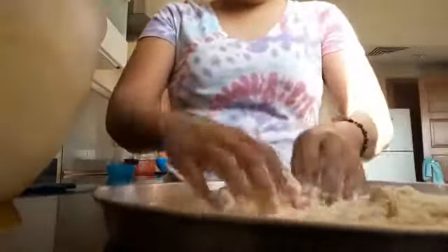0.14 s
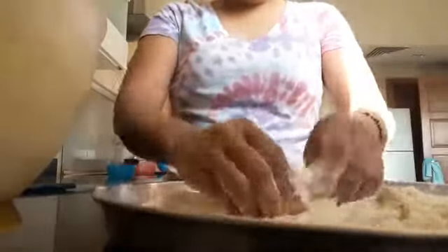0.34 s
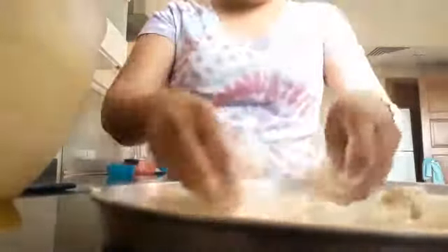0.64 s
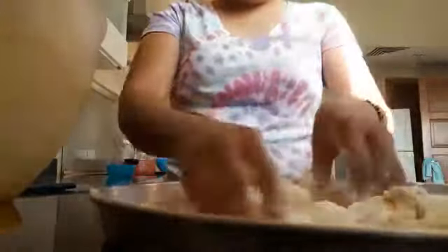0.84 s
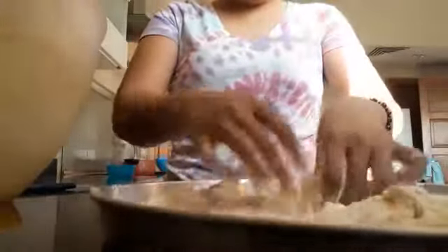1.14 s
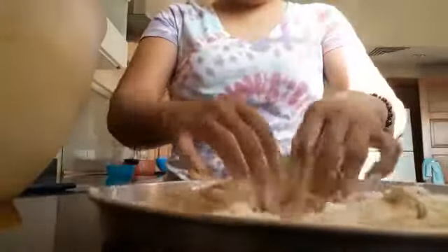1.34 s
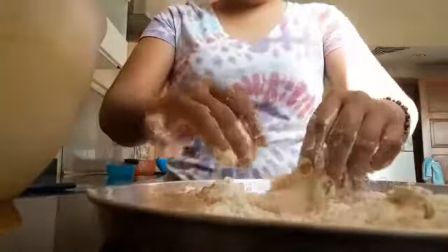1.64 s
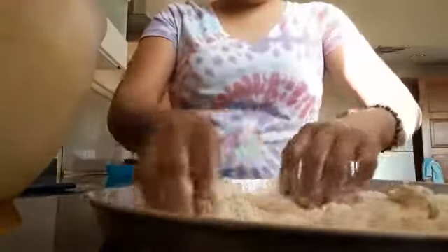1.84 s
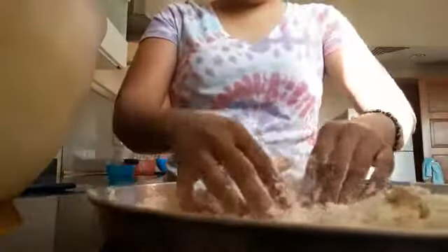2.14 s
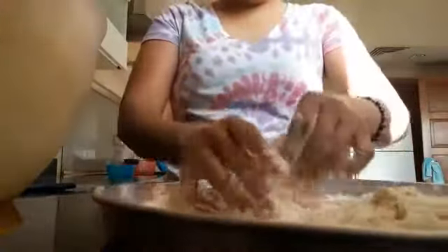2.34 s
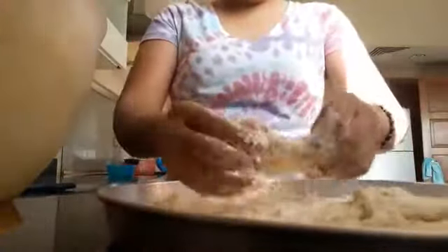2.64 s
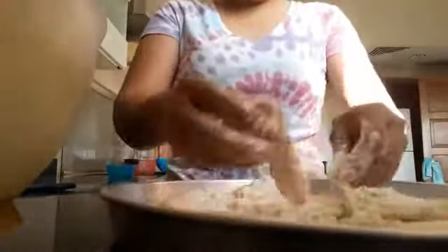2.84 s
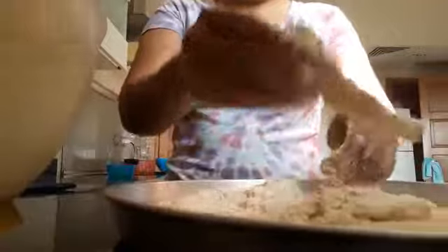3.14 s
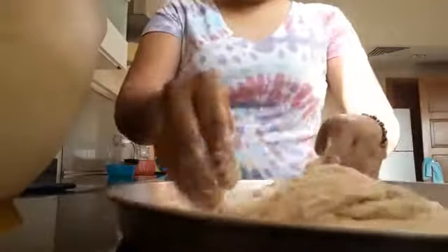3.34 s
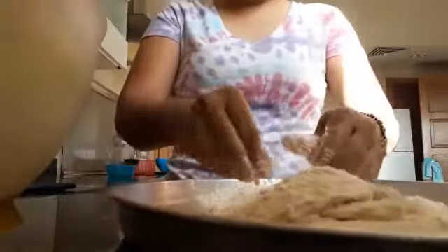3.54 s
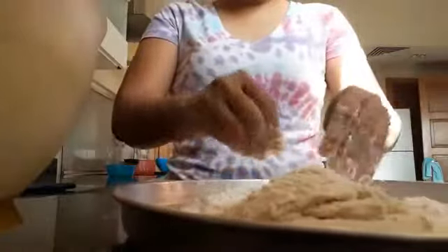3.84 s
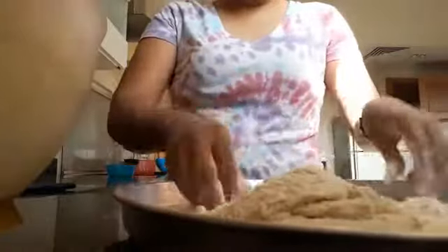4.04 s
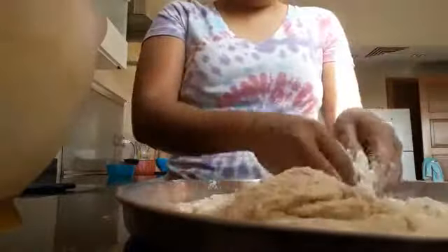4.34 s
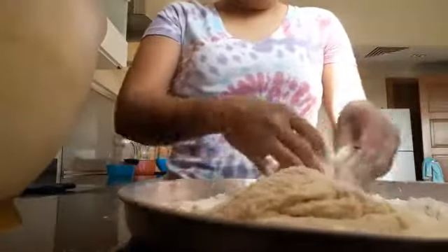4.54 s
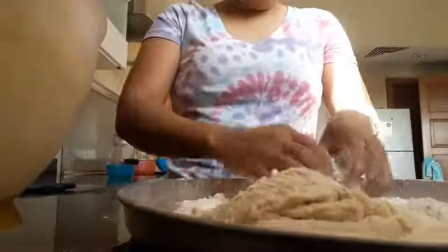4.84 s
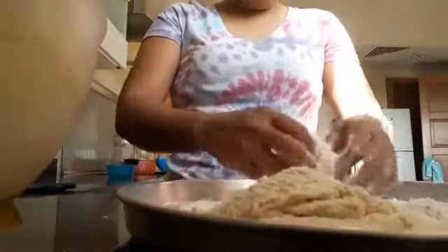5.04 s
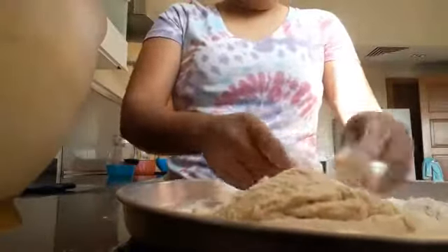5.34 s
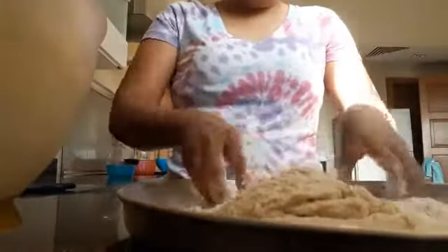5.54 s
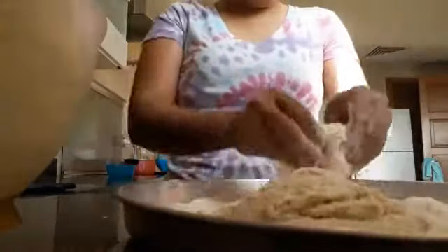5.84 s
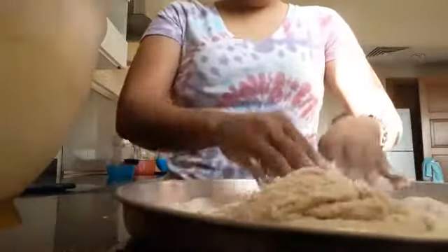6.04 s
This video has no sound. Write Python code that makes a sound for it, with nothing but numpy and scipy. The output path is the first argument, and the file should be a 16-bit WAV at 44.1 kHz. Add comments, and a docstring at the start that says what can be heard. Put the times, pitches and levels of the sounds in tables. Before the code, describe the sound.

Hands turn floured chicken in a wide metal pan: short dry scrapes, powdery hiss, crumbly patter and muffled thuds, with quiet gaps and faint motor hum.

```python
"""Flouring chicken in a metal pan

Two hands turn chicken in dry flour in a wide metal pan, close to a phone in a small kitchen.
Finger strokes rasp: clumped random slips drive the pan's resonances, and filtered grains crunch and hiss.
Loose flour trickles and meat flops as grain showers that swell and run out; bumps, cracks and taps are
short noise bursts. An appliance hums with wavering sines over coloured noise, and a noise tail rings briefly."""
import sys
import numpy as np
from scipy import signal
from scipy.fft import rfft, irfft, next_fast_len
from scipy.io import wavfile
from scipy.ndimage import uniform_filter1d, map_coordinates

SR = 44100
rng = np.random.default_rng(int(sys.argv[2]) if len(sys.argv) > 2 else 0)


def file_out(sig):
    """Save sig as 16-bit WAV at sys.argv[1]."""
    # one column per channel
    cols = np.atleast_2d(sig).T
    # limit, then scale
    lim = np.clip(cols, -1, 1)
    pcm = np.round(lim * 32767).astype(np.int16)
    wavfile.write(sys.argv[1], SR, pcm)


N = 272979

# Finger strokes. Each row: push start in seconds, grip time before it, push time and ease time in seconds,
# swell in dB, rasp, powder hiss and pan body in dB before the mix trims,
# place from 0 (middle of the floor) to 1 (toward the rim), pitch ratio of the pan's ring.
FINGER_STROKES = [ (0.0, .01, 0.0037, 0.0095, -5, -41.5, -47, -47, 0, .99),
                  (0.222, 0.011, 0.065, 0.068, 11.5, -37, -39, -58.5, 0.1, 1.02),
                  (.863, 0.033, 0.091, 0.055, 16, -27, -36, -42.5, .8, 1),
                  (.993, .006, 0.0049, 0.0094, 3, -25.5, -40.5, -47, 1, 1),
                  (1.158, 0.02993, 0.017, .015, 8.5, -36.5, -42, -46, .54, 1.02),
                  (1.212, 0.029, .022, 0.0087, 6, -35, -39, -46.5, 0.8, 1.02),
                  (1.256, .008, 0.0042, .004, 3.5, -42, -48.5, -50, .8, 1),
                  (1.279, 0.0086, 0.019, 0.012, 1, -26.5, -36, -48, 1, 1),
                  (1.899, 0.0074, 0.052, 0.0075, 13, -37, -43, -59, .1, .98),
                  (1.957, 0.013, .033, 0.0055, 3.5, -25, -35.5, -44, 0.3, .99),
                  (2.02, 0.024, 0.047, 0.075, 5, -46, -56, -54.5, 0.7, 1),
                  (2.2, 0.0397, 0.023, .02, 3, -52, -62.5, -68, 0.3, 1),
                  (2.32, 0.036, 0.052, 0.08, 1.5, -58, -66, -59, 0.54, 1),
                  (3.546, .02, 0.013, .01, 4, -60, -64, -67, 0.02, 1.06),
                  (4.066, .018, .012, 0.03537, 2, -45.5, -49, -52, 0.1, 1.06),
                  (4.12, .03, 0.039, 0.092, 9, -37.5, -43, -50.5, 0.5, .94),
                  (4.18, 0.029, 0.072, 0.0079, 10, -34.5, -36, -54, .4, .98),
                  (4.257, .004, 0.047, 0.016, 3.5, -20, -33.5, -45, 0, 1.02),
                  (4.319, 0.022, 0.0061, .05, 0, -34.5, -43, -45, 0.4, .99),
                  (4.75, 0.033, 0.032, .014, 7.5, -49, -57.5, -70, 0.11, 1),
                  (4.807, 0.031, 0.027, 0.03, 4, -53.5, -50.5, -79, 0.16, 1),
                  (4.907, .009, 0.035, 0.0073, 5, -34.5, -45.5, -48.5, 0.12, 1.01),
                  (5.617, 0.025, 0.072, 0.05, 5, -26, -37, -42.5, 0.1, 1.03),
                  (5.72, 0.022, .025, 0.033, 4, -34, -35, -52.5, 0.2, 1.05), ]
# Pan resonances under the fingers, mid-floor and near the rim.
# Each row: frequency in Hz, width in Hz, relative level in dB.
MIDDLE_RESONANCES = [(1123, 240, -13.5), (1788, 166, 4.5), (2082, 152, 2.5), (2590, 150, -12),
                     (3150, 180, -3), (3590, 260, -5.5), (4120, 110, -1), (4960, 220, -11)]
RIM_RESONANCES = [(1061, 64, -8), (1545, 48, -5), (2435, 130, -4.5), (2766, 390, -3.5), (3950, 130, -1),
                  (5270, 580, -5.5)]
# Tone of crunching lumps, hissing powder and the pushed heap. Each row: frequency in Hz, filter gain in dB.
CRUNCH_SPECTRUM = [(300, -27), (800, -33.5), (1200, -6), (3000, 2), (5500, -11), (7000, -11.5),
                   (15000, -25.5)]
POWDER_SPECTRUM = [(1500, -17), (4000, -1.5), (5800, 1), (7000, -0.5), (9500, 2), (11000, -0.5), (13000, 4),
                   (14500, -3.5), (15600, -13.5)]
BODY_SPECTRUM = [(100, -21), (250, -6.5), (450, -0.5), (700, 0.5), (1000, -1), (1300, 2.5), (2200, -30),
                 (6000, -89.5)]
# Spills of loose flour off the fingers and the meat. Each row: start, rise and run-out in seconds,
# crumbs and fine dust in dB before the mix trims.
FLOUR_SPILLS = [ (0.0, 0.0086, 0.26, -45, -63.5), (1.0, .06, 0.55, -52, -55.5),
                (1.12, 0.058, 0.39, -46.5, -58), (1.31, 0.03, 0.32, -53, -58),
                (1.665, 0.058, 0.58, -54.5, -60), (1.99, 0.066, 0.39, -44, -47.5),
                (2.28, .06, 0.47, -53.5, -59), (3.199, 0.11, 0.56, -66, -78), (3.734, 0.028, .15, -64, -56),
                (3.88, 0.047, 0.096, -78.5, -64.5), (5.589, 0.0071, 0.11, -48, -47.5),
                (6.135, 0.021, 0.13, -66.5, -72.5), ]
# Tone of trickling crumbs and falling dust. Each row: frequency in Hz, filter gain in dB.
CRUMB_SPECTRUM = [(500, -17), (900, 2.5), (1200, 0), (1500, -4), (1900, 0.5), (2300, -1), (2700, -0.5),
                  (3400, -8), (4100, -9.5), (6000, -12.5), (10000, -34)]
DUST_SPECTRUM = [(2000, -18.5), (4200, -15), (5500, 1), (7000, 2.5), (9000, 4.5), (11000, -1), (13000, -2),
                 (15000, -5), (15600, -14.5)]
# Meat dropped softly into the heap, and the turned piece settling on it.
# Each row: start, rise and run-out in seconds, level in dB (the flops before a mix trim).
MEAT_FLOPS = [(0.0, 0.0032, 0.31, -51.5), (.38, .04, 0.32, -52.5), (1.03, 0.078, 0.56, -55),
              (1.675, 0.019, 0.26, -41.5), (1.99, 0.02, 0.39, -50)]
MEAT_SETTLING = [ (3.15, .16, .36, -50.5), ]
# Hands and meat bumping the pan. Each row: time in seconds, burst level in dB before filter and trim.
PAN_BUMPS = [(.69, -50), (1.898, -39.5), (4.108, -34), (5.597, -33.5), (5.7, -36.5)]
# Tone of the patter, the settling heap and the thuds. Each row: frequency in Hz, filter gain in dB.
PATTER_SPECTRUM = [(200, -28.5), (380, 2), (480, -6.5), (590, 4), (790, -2.5), (1000, -12.5), (1400, -18.5),
                   (3000, -39), (8000, -88.5)]
SLUMP_SPECTRUM = [(200, -27), (300, -7.5), (370, 9.5), (450, 3), (560, -9), (900, -14), (4000, -72)]
THUD_SPECTRUM = [(30, -30.5), (70, 7), (130, -1), (260, -1.5), (500, -19.5), (3000, -89)]
# The appliance's main hum. Each row: time in seconds, level in dB before a small trim.
HUM_LEVEL = [(0.0, -54.5), (0.15, -62.5), (1.55, -57), (1.65, -60), (3.31, -48.5), (3.59, -71.5),
             (3.79, -60), (4.52, -55), (4.88, -72), (5.07, -58), (5.9, -51), (6.19, -64)]
# The motor's weaker tones. Each row: frequency in Hz, middle level in dB.
MOTOR_TONES = [(107, -68), (134, -78.5), (187, -67.5), (366, -70), (432, -64.5)]
# Tone of the air rush. Each row: frequency in Hz, filter gain in dB.
AIR_SPECTRUM = [(15, -58.5), (25, -22), (144, -6), (215, -4), (267, -5.5), (433, -8.5), (496, -14),
                (583, -15.5), (742, -13.5), (1530, -33.5), (1760, -29.5), (2930, -41.5), (7310, -47.5),
                (8360, -39.5), (15500, -61.5)]
# Crumbs cracking under the fingers, and fingertips tapping the floured metal.
# Each row: time in seconds, burst level in dB before filter and trim.
CRUMB_CRACKS = [(0.9599, -3), (0.9911, -25), (2.2935, -22), (4.265, -16), (4.2968, -18.5), (4.7688, -23),
                (4.9197, -26), (4.9446, -40), (5.6616, -11.5)]
FINGER_TAPS = [(.683, -47), (4.163, -32.5), (5.423, -49), (5.433, -49.5), (5.593, -26), (5.699, -24)]
# Tone of a dull fingertip tap. Each row: frequency in Hz, filter gain in dB.
TAP_SPECTRUM = [(120, -12.5), (300, -3), (700, 0), (1200, 2.5), (1900, 0), (3000, -10), (4500, -23.5),
                (12000, -24)]
# Bounces to and fro inside the pan's rim. Each row: delay in milliseconds, level in dB.
RIM_ECHOES = [(1.1, -24.5), (2.3, -11.5), (3.401, -19), (5.2, -9.5)]
# How long the room rings. Each row: frequency in Hz, 60 dB decay time in seconds.
KITCHEN_DECAY = [(200, 0.67), (1000, 0.81), (2500, 0.62), (5000, 0.62), (9000, 0.56), (12000, 0.32),
                 (15000, 0.55)]

GRIP_DB = 20  # growth over the grip time, as the fingers take hold
SWELL_CURVE = 1.3  # above 1, the pressure climbs fast at first and rounds off toward its peak
EASE_DB = 9.0  # the pressure drops this much before the fingers lift
LIFT_DB_PER_S = 800.5  # how fast they let go
HISS_LAW, BODY_LAW = 0.78, 0.52  # dB of powder hiss and of pan body per dB of rasp within a stroke
RUN_OUT_DB = 27  # what sliding flour or meat loses over its run-out time
HUM_HZ, AIR_DB = 216.6, -55.5
RIM_HZ = 2800  # the rim's reflection reaches half strength here and grows above
LOW_CUT_HZ, TOP_HZ = 34, 15650  # the phone's bass roll-off and band limit


def amp(db):
    """Decibels to gain."""
    return 10 ** (np.asarray(db) / 20)


def unit(x):
    """Scale to rms 1."""
    return x / np.sqrt(np.mean(x ** 2) + 1e-20)


def steady(x):
    """Hold the short-term rms (about 25 ms) near 1 and keep the fine grain."""
    return x / np.sqrt(np.abs(uniform_filter1d(x ** 2, size=1100)) + 1e-9)


def along(points, hz):
    """Read (Hz, value) points on a log frequency axis."""
    f, v = np.transpose(points)
    return np.interp(np.log(hz + 1), np.log(f + 1), v)


def curve(rows):
    """One value per sample from (seconds, value) rows."""
    return np.interp(np.arange(N) / SR, *np.transpose(rows))


def wobble(rate):
    """A smooth random curve, rate knots a second."""
    knots = rng.standard_normal(int(N * rate / SR) + 4)
    coarse = np.arange(0, N, 16)
    smooth = map_coordinates(knots, [coarse * rate / SR])
    return np.interp(np.arange(N), coarse, smooth)


def filtered(x, response):
    """Multiply the spectrum of x by a response of frequency."""
    m = next_fast_len(N + SR // 2)
    hz = np.fft.rfftfreq(m, 1 / SR)
    return irfft(rfft(x, m) * response(hz), m)[:N]


def shaped(x, spectrum):
    """Filter x by a table of gains."""
    return filtered(x, lambda hz: amp(along(spectrum, hz)))


def coloured(x, spectrum):
    """Filter x by a table of gains, at rms 1."""
    return unit(shaped(x, spectrum))


def grains(rate, clump_db, clump_rate):
    """Tiny random slips, rate a second on average, whose strength swells in clumps."""
    slips = (rng.random(N) < rate / SR) * rng.standard_normal(N)
    return unit(slips * amp(clump_db * wobble(clump_rate)))


def bursts(events, t60):
    """A dying puff of noise at each (seconds, dB) event."""
    out, t = np.zeros(N + SR), np.arange(SR // 4) / SR
    for start, db in events:
        puff = amp(db - 60 * t / t60) * rng.standard_normal(len(t))
        out[round(start * SR):][:len(t)] += puff
    return out[:N]


def together(shapes, levels_db):
    """Gain over time of several events, whose powers add."""
    return np.sqrt(amp(levels_db) ** 2 @ shapes ** 2)


def pressure(start, grip, push, ease, swell_db):
    """One stroke: the fingers take hold, press ever harder, ease off and lift."""
    t = np.arange(N) / SR - start
    swell = swell_db * np.clip(1 - t / push, 0, 1) ** SWELL_CURVE
    easing = EASE_DB * np.clip((t - push) / ease, 0, 1) ** 2
    gripping = GRIP_DB * np.maximum(-t, 0) / grip
    lifting = LIFT_DB_PER_S * np.maximum(t - push - ease, 0)
    return amp(-swell - easing - np.minimum(gripping + lifting, 200))


def fingers():
    """Pressure drives rasp, hiss and body; the strongest stroke dominates the ring's place and pitch."""
    shapes = np.array([pressure(*row[:5]) for row in FINGER_STROKES])
    *_, rasp_db, hiss_db, body_db, place, pitch = np.transpose(FINGER_STROKES)
    rasp = together(shapes, rasp_db)
    powder = together(shapes ** HISS_LAW, hiss_db)
    push = together(shapes ** BODY_LAW, body_db)
    weight = (amp(rasp_db)[:, None] * shapes) ** 2 + 1e-14
    weight = weight / weight.sum(axis=0)
    return rasp, powder, push, np.clip(place @ weight, 0, 1), pitch @ weight


def ringing(x, modes, sway_db):
    """Damped resonances at rms 1; moving fingers keep changing each one's strength."""
    bands = []
    for hz, width, db in modes:
        band = signal.lfilter(*signal.iirpeak(hz, hz / width, SR), x)
        bands.append(band * amp(db + sway_db * wobble(22)))
    # neighbours in opposite polarity
    return unit(sum(bands[::2]) - sum(bands[1::2]))


def pan_ring(rasp, place, pitch):
    """Packed flour sticks and slips under the fingers and drives the pan, whose ring shifts with their place."""
    slips = grains(rate=6000, clump_db=-0.5, clump_rate=230)
    read_at = np.cumsum(pitch)  # reading faster or slower bends the pitch

    def bent(modes):
        return map_coordinates(ringing(slips, modes, sway_db=3.0), [read_at], mode="mirror")

    ring = np.sqrt(1 - place) * bent(MIDDLE_RESONANCES) + np.sqrt(place) * bent(RIM_RESONANCES)
    return amp(-1.5) * rasp * steady(ring)


def scrapes(rasp, powder, push):
    """The flour itself: crunching lumps, hissing powder and the dull push of the heap."""
    crunch = rasp * steady(coloured(grains(rate=1800, clump_db=0.5, clump_rate=360), CRUNCH_SPECTRUM))
    hiss = powder * coloured(grains(rate=9000, clump_db=1.15, clump_rate=190), POWDER_SPECTRUM)
    body = push * steady(coloured(grains(rate=5000, clump_db=1, clump_rate=140), BODY_SPECTRUM))
    return amp(-8.5) * crunch + amp(0.5) * hiss + amp(-1.5) * body


def slide(start, rise, run_out):
    """Loose stuff starts to slide, peaks and runs out."""
    t = np.arange(N) / SR - start
    return np.clip(t / rise, 0, 1) * amp(-RUN_OUT_DB * np.maximum(t - rise, 0) / run_out)


def loose_flour():
    """Crumbs patter back into the pan in a haze of dust, with a few larger lumps among them."""
    shapes = np.array([slide(*row[:3]) for row in FLOUR_SPILLS])
    *_, crumbs_db, dust_db = np.transpose(FLOUR_SPILLS)
    small = grains(rate=5000, clump_db=1.2, clump_rate=49)
    lumps = grains(rate=180, clump_db=0, clump_rate=67)
    crumbs = together(shapes, crumbs_db) * coloured(small + amp(-12) * lumps, CRUMB_SPECTRUM)
    fine = grains(rate=9500, clump_db=1.2, clump_rate=72)
    dust = together(shapes, dust_db) * coloured(fine, DUST_SPECTRUM)
    return amp(-1.0) * crumbs + amp(1.0) * dust


def meat():
    """Soft pieces patter dully into the heap and settle; hands and meat thud against the pan."""
    def falling(rows):
        return together(np.array([slide(*row[:3]) for row in rows]), [row[-1] for row in rows])

    soft = coloured(grains(rate=2200, clump_db=0.5, clump_rate=190), PATTER_SPECTRUM)
    patter = falling(MEAT_FLOPS) * steady(soft)
    sliding = coloured(grains(rate=2200, clump_db=2.8, clump_rate=100), SLUMP_SPECTRUM)
    slump = falling(MEAT_SETTLING) * sliding
    thuds = shaped(bursts(PAN_BUMPS, t60=0.15), THUD_SPECTRUM)
    return amp(3.0) * patter + slump + amp(10) * thuds


def appliance():
    """A motor hums with slightly unsteady tones over a rush of air."""
    t = np.arange(N) / SR

    def tone(hz, drift):  # drift: phase wander in radians
        return np.sqrt(2) * np.sin(2 * np.pi * hz * t + drift * wobble(6.5))

    hum = amp(curve(HUM_LEVEL) - 0.2) * tone(HUM_HZ, drift=0.2)
    others = sum(amp(db + 3.4 * wobble(5.6)) * tone(hz, drift=0.93) for hz, db in MOTOR_TONES)
    air = amp(AIR_DB) * coloured(rng.standard_normal(N), AIR_SPECTRUM)
    return hum + others + air


def ticks():
    """Crumbs crack sharply and fingertips tap dully; the flour damps the metal almost at once."""
    cracks = shaped(bursts(CRUMB_CRACKS, t60=0.016), CRUNCH_SPECTRUM)
    taps = shaped(bursts(FINGER_TAPS, t60=0.06), TAP_SPECTRUM)
    return amp(-7.0) * cracks + amp(6.5) * taps


def rim_bounces(x):
    """The low rim reflects mainly short waves; they comb the treble into narrow ridges."""
    def comb(hz):
        share = hz ** 4 / (hz ** 4 + RIM_HZ ** 4)
        copies = sum(amp(db) * np.exp(-2j * np.pi * hz * ms / 1000) for ms, db in RIM_ECHOES)
        power = 1 + share ** 2 * sum(amp(db) ** 2 for ms, db in RIM_ECHOES)
        return (1 + share * copies) / np.sqrt(power)  # keeps the overall level
    return filtered(x, comb)


def kitchen(x):
    """The walls answer with a diffuse noise tail that decays at its own pace in each frequency band."""
    hz, t, z = signal.stft(rng.standard_normal(SR), SR, nperseg=256)
    t60 = along(KITCHEN_DECAY, hz)[:, None]
    tail = signal.istft(z * amp(-60 * t / t60), SR, nperseg=256)[1]
    delayed = np.pad(x, (SR // 128, 0))  # about 8 ms before the walls answer
    return signal.fftconvolve(delayed, tail / np.linalg.norm(tail))[:N]


def scene():
    """The work in the pan, its echo and the hum; the metal is so near that its ring arrives almost dry."""
    rasp, powder, push, place, pitch = fingers()
    ring = pan_ring(rasp, place, pitch)
    flour = scrapes(rasp, powder, push) + loose_flour() + meat() + ticks()
    echo = kitchen(amp(-13.5) * flour + amp(-20.5) * ring)
    return (ring + rim_bounces(flour) + echo + appliance())[None]


def record(dry):
    """The phone adds a trace of hiss, thins the deepest bass and keeps nothing above its band limit."""
    hiss = amp(-79.0) * rng.standard_normal(N)

    def phone(hz):
        return hz ** 2 / (hz ** 2 + LOW_CUT_HZ ** 2) * (hz < TOP_HZ)

    return filtered(dry[0] + hiss, phone)[None]


dry = scene()
out = record(dry)
file_out(out)
```